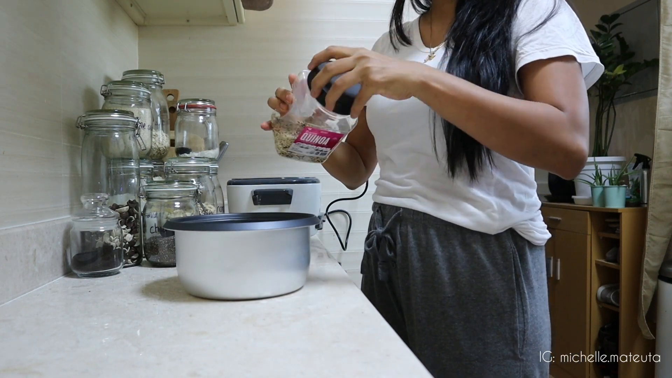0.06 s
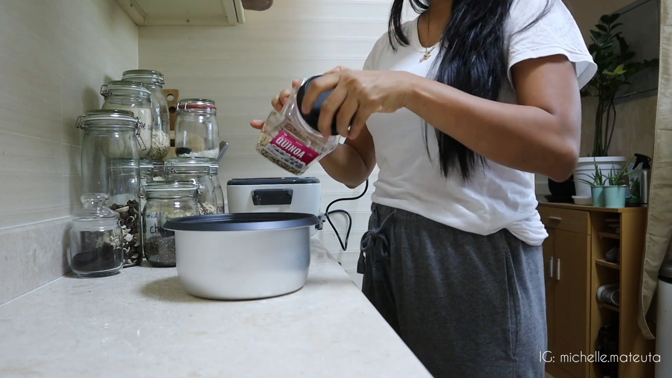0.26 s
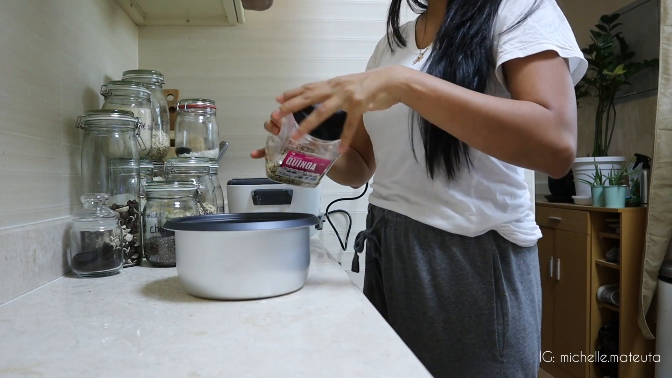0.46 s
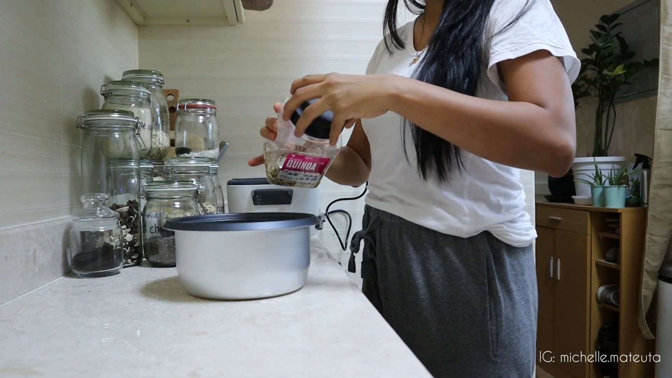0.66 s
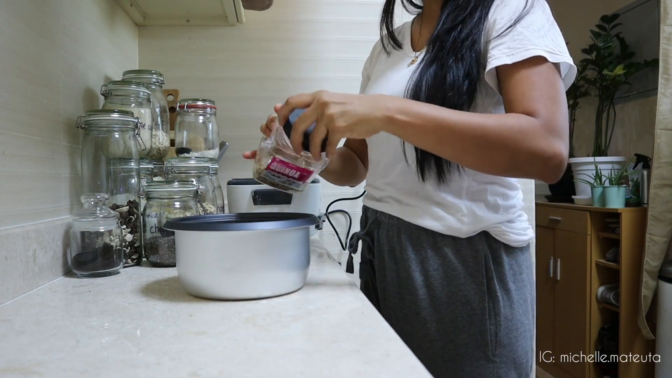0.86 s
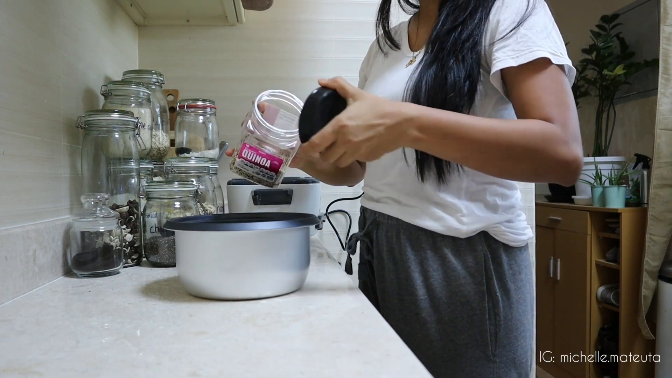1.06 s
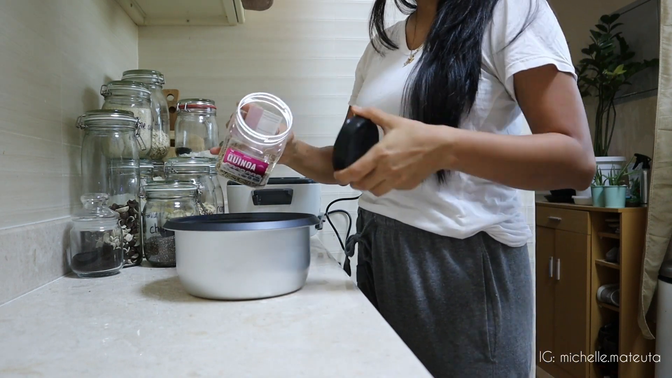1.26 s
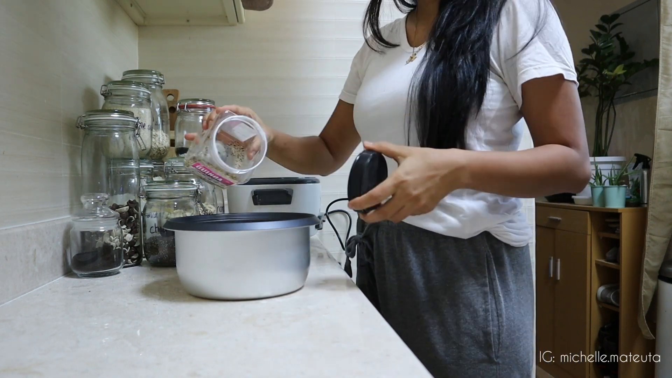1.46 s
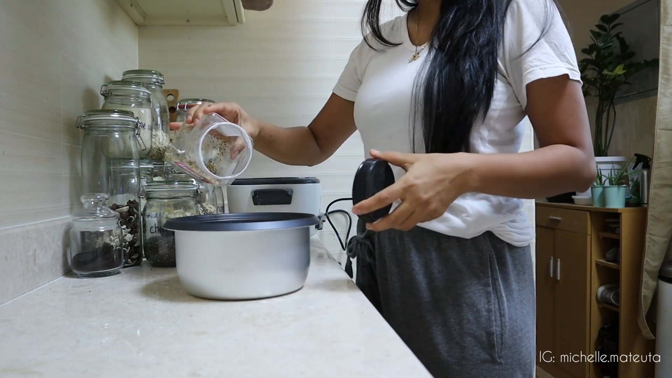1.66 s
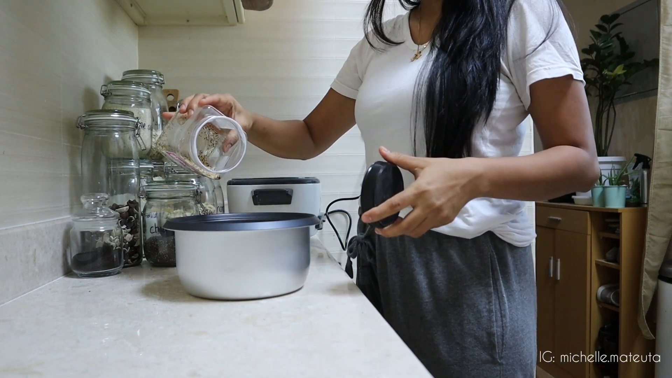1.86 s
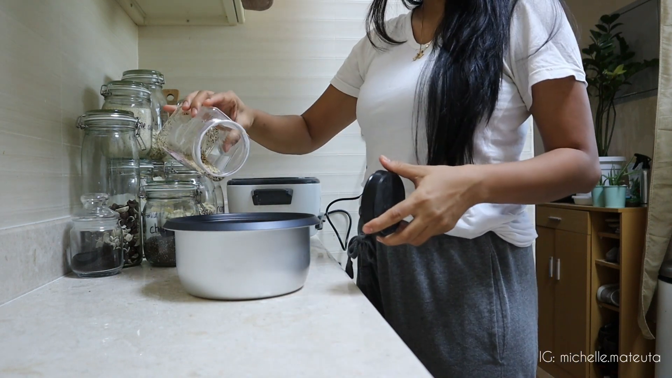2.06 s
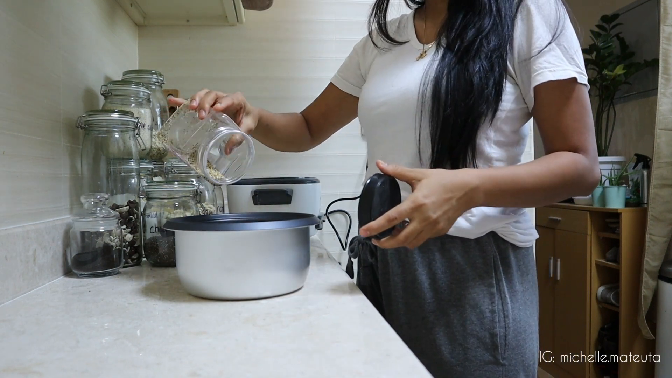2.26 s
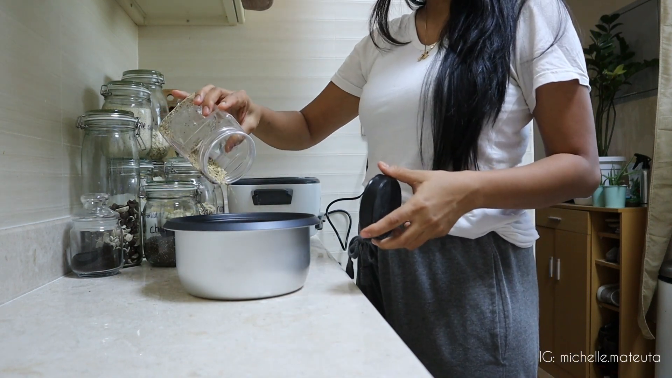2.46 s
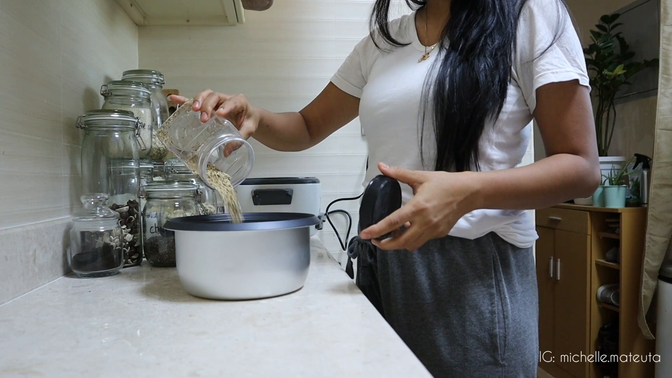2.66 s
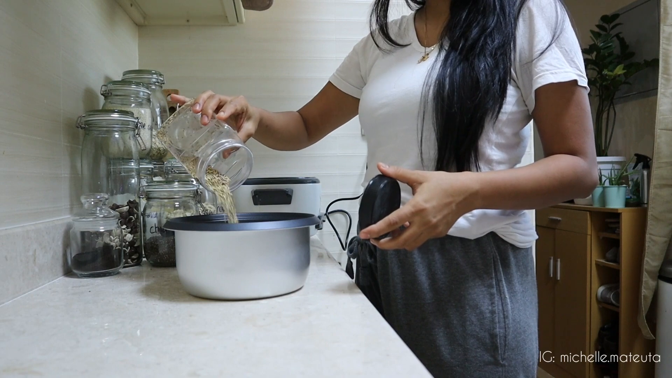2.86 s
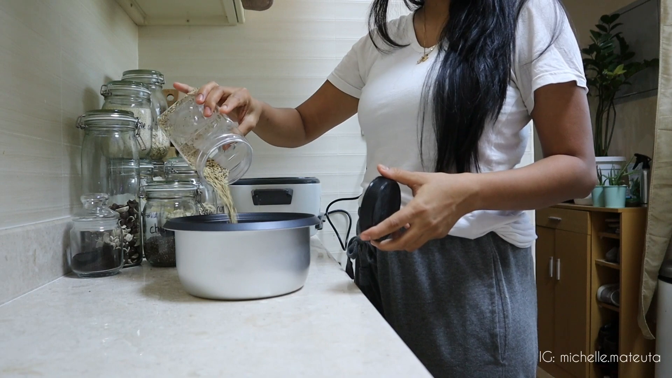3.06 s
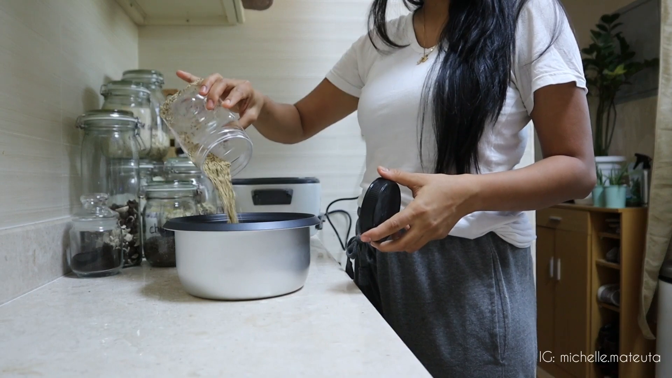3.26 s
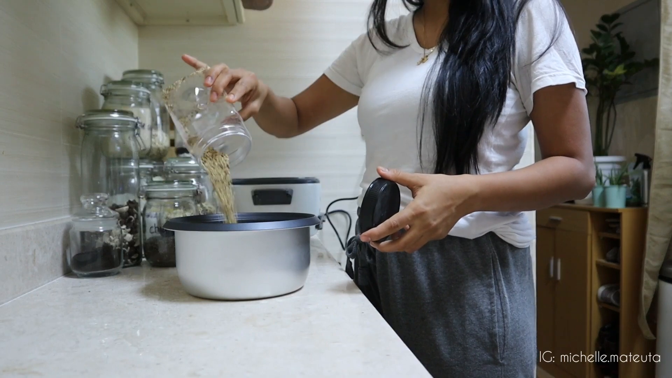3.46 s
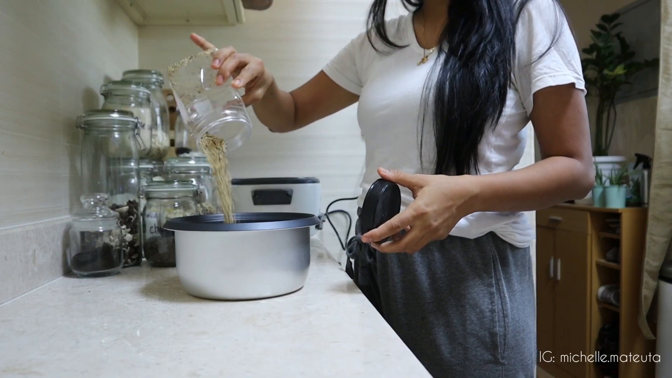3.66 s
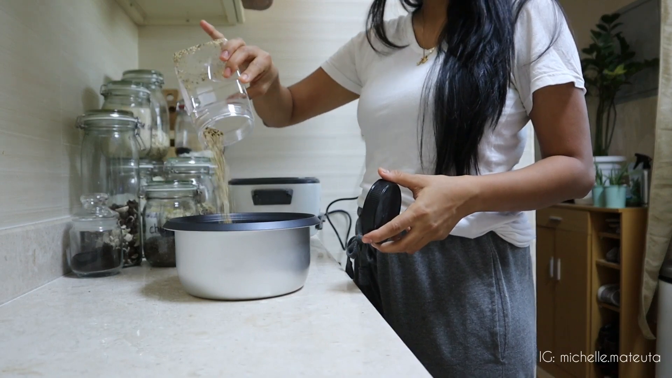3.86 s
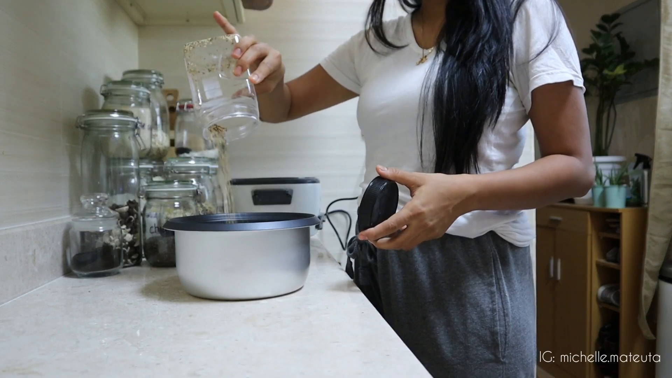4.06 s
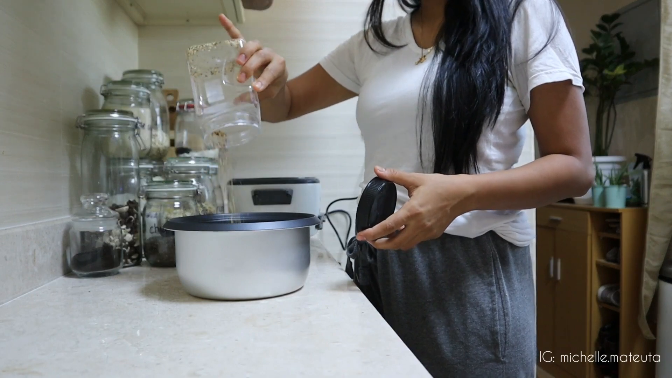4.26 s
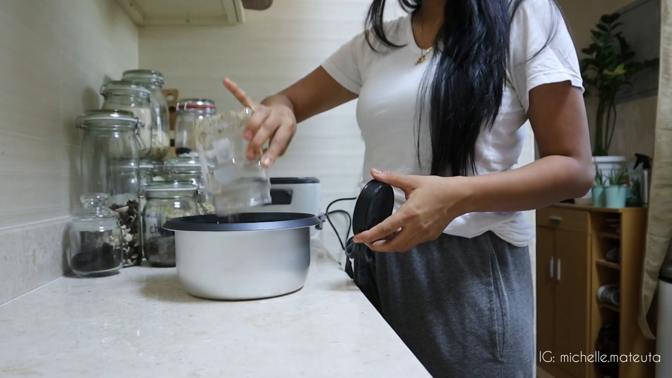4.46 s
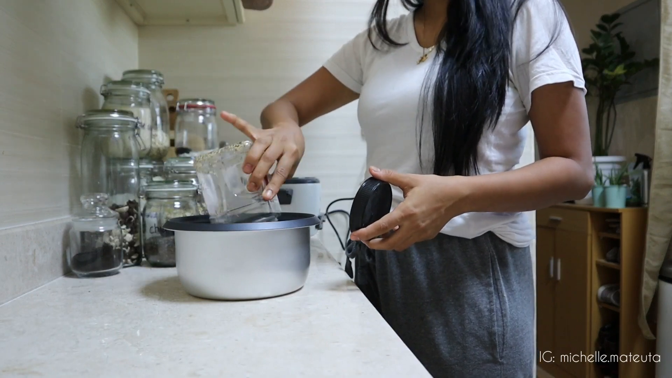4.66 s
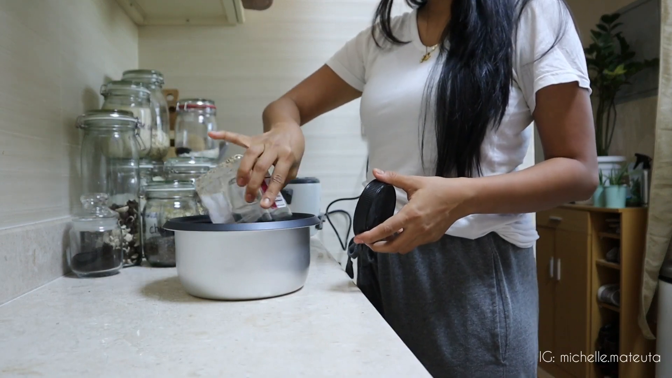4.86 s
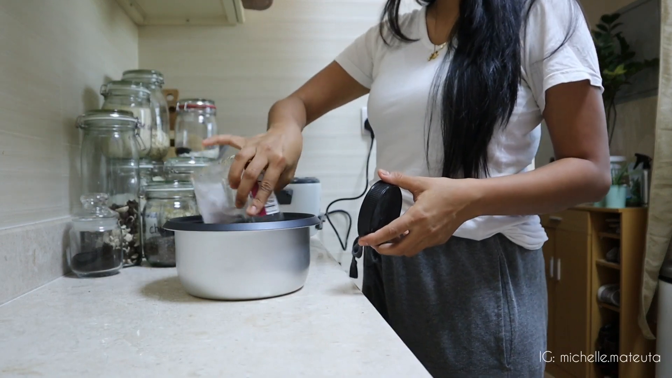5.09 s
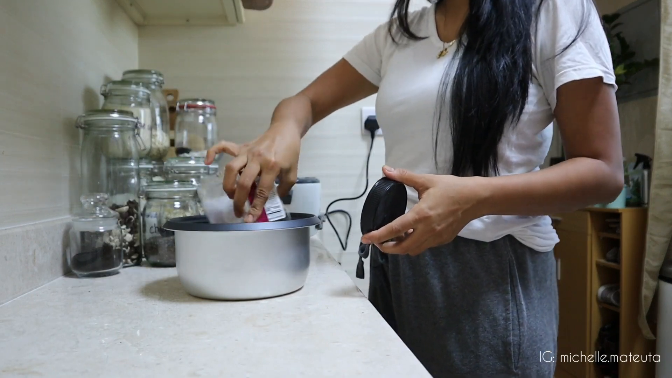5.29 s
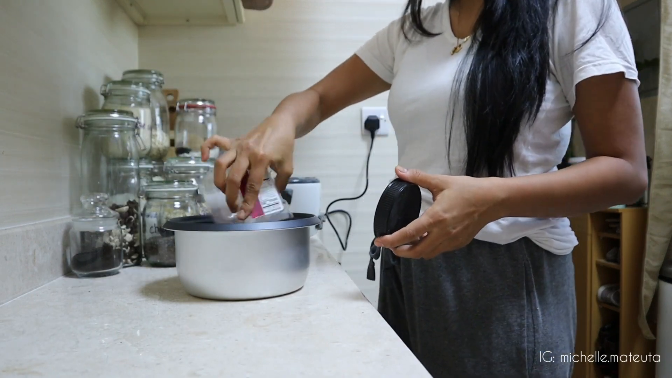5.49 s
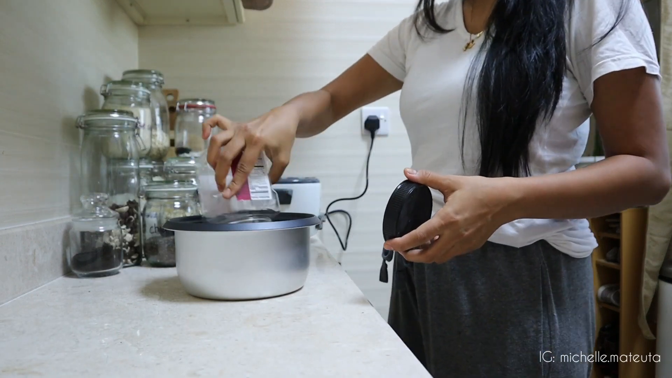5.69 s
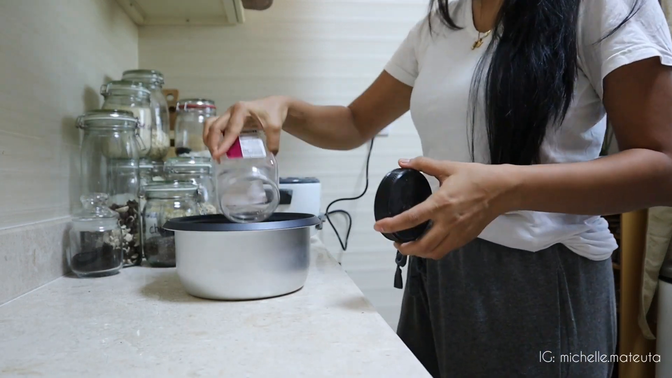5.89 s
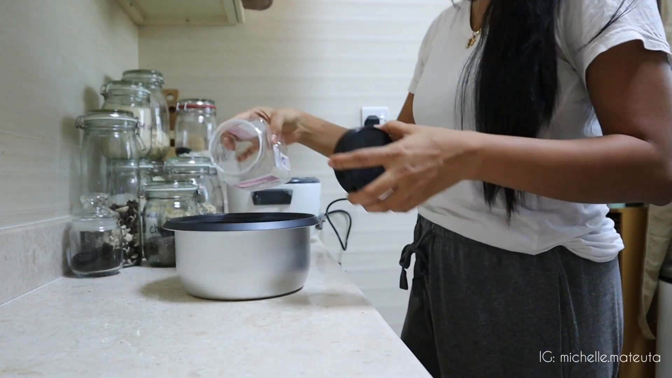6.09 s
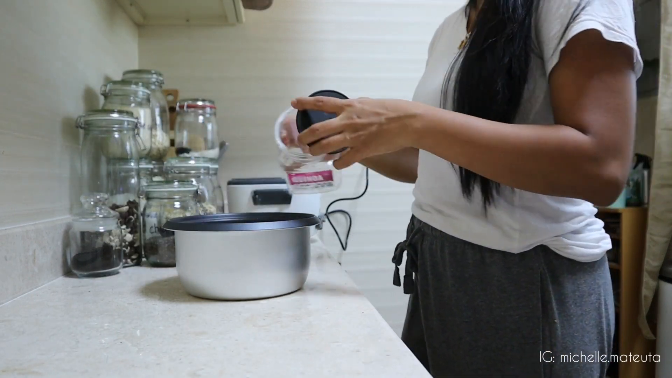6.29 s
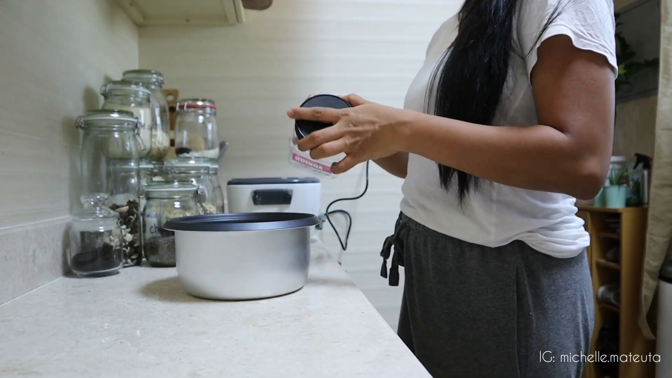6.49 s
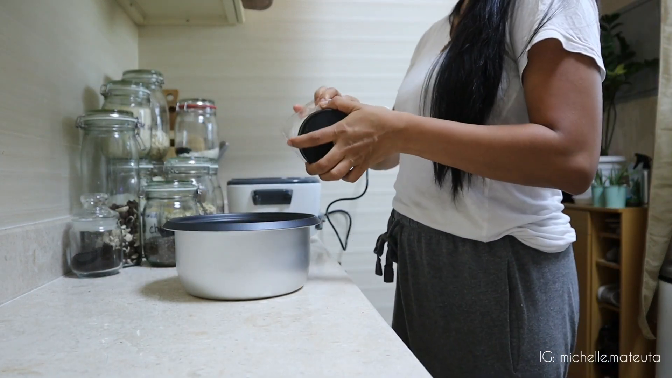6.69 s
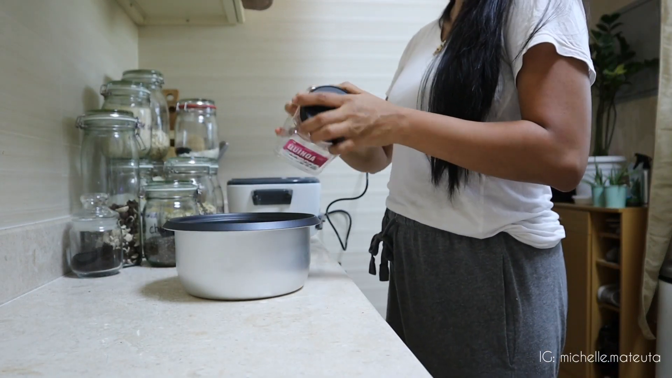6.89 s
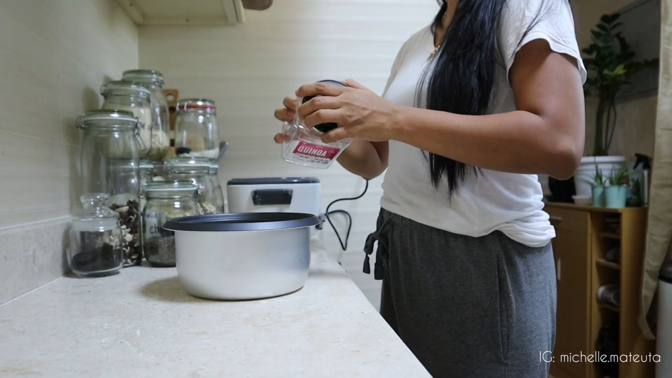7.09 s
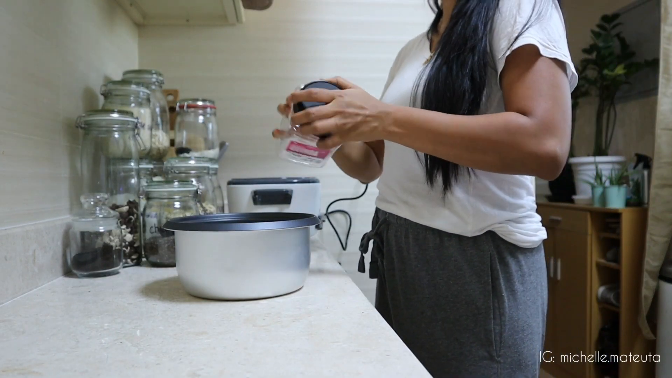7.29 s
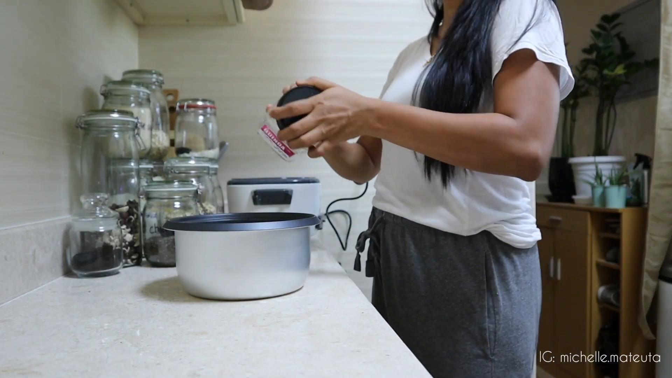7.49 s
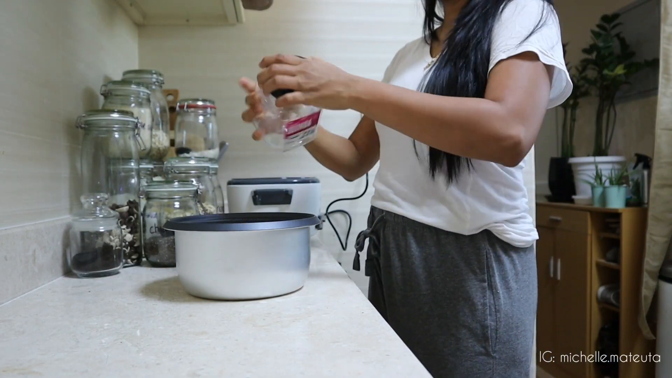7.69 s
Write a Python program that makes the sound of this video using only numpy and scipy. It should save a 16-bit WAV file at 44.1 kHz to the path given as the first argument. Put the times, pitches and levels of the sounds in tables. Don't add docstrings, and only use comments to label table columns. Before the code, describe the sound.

A screw lid rubs and snaps off a jar, dry grains rush hissing into a ringing metal pot, then the lid knocks and snaps back on.

```python
import sys
import numpy as np
from scipy import signal
from scipy.fft import rfft, irfft
from scipy.io import wavfile
from scipy.ndimage import uniform_filter1d

SR = 44100
rng = np.random.default_rng(int(sys.argv[2]) if len(sys.argv) > 2 else 0)


def wav_out(sig):
    wavfile.write(sys.argv[1], SR, np.round(np.clip(np.atleast_2d(sig).T, -1, 1) * 32767).astype(np.int16))


def decibels_to_gain(level_db):
    exponent = np.asarray(level_db, float) / 20
    return 10 ** exponent


N = 341334
CONTROL_STEP = 32


def rms_one(x):
    return x / np.sqrt(np.mean(x ** 2) + 1e-20)


def in_time(*tables):
    rows = []
    for table in tables:
        first, last = table[0], table[-1]
        rows += [(first[0] - .02, -120, *first[2:]), *table, (last[0] + .02, -120, *last[2:])]
    s, *columns = np.transpose(rows)
    return [np.interp(np.arange(N) / SR, s, column) for column in columns]


def at_hz(points, hz):
    table = np.array(points)
    return np.interp(np.log(hz + 1), np.log(table[:, 0]), table[:, 1])


def colour(x, spectrum):
    size = 4096
    cepstrum = irfft(np.log(decibels_to_gain(at_hz(spectrum, np.arange(size // 2 + 1) * SR / size))))
    cepstrum[1:size // 2] *= 2
    cepstrum[size // 2 + 1:] = 0
    pulse = irfft(np.exp(rfft(cepstrum)))
    return signal.oaconvolve(x, pulse / np.sqrt(np.sum(pulse ** 2)))[:N]


def resonate(x, hz, width):
    r, w = np.exp(-np.pi * width / SR), 2 * np.pi * hz / SR
    return signal.lfilter([0, np.sin(w)], [1, -2 * r * np.cos(w), r * r], x + 1e-18)


def body(x, peaks):
    out = 0
    for k, (hz, width, db) in enumerate(peaks):
        out = out + (-1) ** k * decibels_to_gain(db) * width / 50 * resonate(x, hz, width)
    return out


def cut(x, hz, kind):
    sos = signal.butter(2, hz, kind, fs=SR, output="sos")
    return signal.sosfilt(sos, x + np.resize([1e-18, 0], N))


def drift(rate):
    r = np.exp(-2 * np.pi * rate / SR)
    return rms_one(signal.lfilter([1], [1, -2 * r, r * r], rng.standard_normal(N + SR))[SR:])


def grains(per_s, spread_db, clump_db, clump_rate):
    sizes = decibels_to_gain(spread_db * np.minimum(rng.exponential(1, N), 4)) * rng.choice([-1, 1], N)
    landed = rng.random(N) < per_s / SR
    return rms_one(sizes * landed * decibels_to_gain(clump_db * drift(clump_rate)))


def bursts(times, gains, length):
    t = np.arange(12000) / SR
    out = np.zeros(N + len(t))
    for s, gain in zip(times, gains):
        out[round(s * SR):][:len(t)] += gain * rng.standard_normal(len(t)) * decibels_to_gain(-60 * t / length)
    return out[:N]


def tones(rows):
    t, out = np.arange(12000) / SR, np.zeros(N + 12000)
    for s, hz, width, db in rows:
        out[int(s * SR):][:len(t)] += decibels_to_gain(db) * np.sin(2 * np.pi * hz * t) * np.exp(-np.pi * width * t)
    return out[:N]


def stroke(s, db, hold, rise, fall):
    t = np.arange(0, N, CONTROL_STEP) / SR
    return decibels_to_gain(db - np.maximum(np.maximum(rise * (s - t), fall * (t - s - hold)), 0))


def smooth(control):
    return np.interp(np.arange(N), np.arange(0, N, CONTROL_STEP), control)


def near(hz, strongest_hz, db_per_octave):
    return decibels_to_gain(-db_per_octave * np.abs(np.log2(hz / strongest_hz)))


# f/Hz, width/Hz, level/dB
JAR_AIR = [(180, 35, -3), (250, 70, -1), (291, 25, -4), (345, 22, -3), (425, 24, 0), (525, 22, 0),
           (585, 25, -8)]
# f/Hz, width/Hz, level/dB
JAR_WALL = [(666, 166, 1.5), (838, 160, 4), (925, 186, 1.5), (1138, 106, -2.5), (1374, 146, -1),
            (1650, 230, -3.5), (1804, 146, -2.5), (1958, 115, -3), (2340, 320, -5), (2816, 78, -3.5),
            (3210, 120, -8.5)]
# f/Hz, width/Hz, level/dB
THREAD_TONES = [(650, 71, -18), (903, 60, 4), (1335, 120, 0.5), (1900, 140, 2.5)]
# t/s, boom level/dB, hold/s, wall level above boom/dB, favoured air f/Hz
UNSCREW = [
    (0.0, -40.5, 0.072, 1.5, 410),
    (.2, -45, 0.2, 9, 432),
    (.345, -42.5, 0.037, 1, 424),
    (.488, -43.5, 0.009, 4, 427),
    (.668, -51.5, 0.014, 3, 332),
    (.775, -46, 0.075, 5, 480),
    (.87, -54.5, 0.12, 8, 307),
    (.93, -44, 0.03, 2, 420),
]
STIR = [
    (4.912, -45.5, 0.0026, 17.5, 438),
    (5.07, -33, 0, 8.5, 436),
    (5.2, -38.5, 0.00096, 12.5, 437),
    (5.31, -47, 0.076, 11.5, 430),
    (5.48, -42, 0, 8, 430),
    (5.618, -48.5, 0.029, 9, 420),
    (5.786, -49.5, .0, 7, 424),
    (5.86, -62, 0.056, -5, 440),
]
SCREW_ON = [
    (6.53, -27, 0.025, 6, 467),
    (6.588, -27, 0.026, 0, 424),
    (6.955, -34.5, 0.057, 5.5, 407),
    (7.135, -31, 0.023, -14, 423),
    (7.612, -35.5, .0, 5.5, 390),
    (7.66, -37.5, 0.04, -2, 390),
    (7.74, -25, .0, 6, 408),
]
SEAT = [
    (6.468, -11.5, 0.016, -11, 525),
    (6.66, -36.5, 0.14, 6, 256),
    (6.815, -23, 0.0046, -2, 400),
    (7.09, -27, 0.04, -9, 392),
    (7.41, -22.5, 0.092, 8, 393),
]


def rubbing():
    gains, shares, walls = [], [], []
    tones_hz = np.array(JAR_AIR)[:, 0]
    # table, rise and fall (dB/s), selectivity (dB per octave)
    gestures = ((UNSCREW, 160.0, 200.0, 21), (STIR, 200.0, 130.0, 60),
                (SCREW_ON, 350.0, 380.0, 34), (SEAT, 6000.0, 260.0, 34))
    for rows, rise, fall, spread in gestures:
        for s, db, hold, wall_db, air_hz in rows:
            share = near(tones_hz, air_hz, spread)
            gains.append(stroke(s, db, hold, rise, fall))
            shares.append(share / np.linalg.norm(share))
            walls.append(decibels_to_gain(wall_db))
    air, shell = np.transpose(shares) @ gains, np.array(walls) @ gains
    slips = cut(grains(900, spread_db=0.0, clump_db=1.0, clump_rate=48), 145, "high")
    boom = 0
    for gain, mode in zip(air, JAR_AIR):
        hz, width, _ = mode
        boom = boom + smooth(gain) * rms_one(body(body(slips, [mode]), [(hz, 3 * width, 0)]))
    empty_wall = rms_one(cut(body(slips, JAR_WALL), 650, "high"))
    full_wall = rms_one(body(slips, THREAD_TONES))
    wall = np.where(np.arange(N) < 1.1 * SR, full_wall, empty_wall)
    return decibels_to_gain(-5.5) * boom + decibels_to_gain(-11.5) * smooth(shell) * wall


# f/Hz, level/dB per Hz
RUSTLE = [(300, -40), (425, -3), (762, -7), (885, -1.5), (994, -8), (2100, -6.5), (2900, 0), (6000, -4.5),
          (12100, -10.5), (16000, -14)]
# t/s, level/dB, brightness/dB
TURN = [
    (0.0, -45.5, 7),
    (.37, -43.5, 5),
    (.422, -48, 2),
    (.496, -42, 8),
    (.7, -54.5, 5.5),
    (.74, -72, -4),
    (.81, -50.5, -4),
    (.918, -51, 4),
    (.96, -47, 7),
]
# t/s, level/dB, brightness/dB
TIP = [
    (1.2, -56, 8),
    (1.4, -56, 4),
    (1.6, -60.5, -12),
    (1.67, -49.5, 5),
    (1.788, -38.5, 5),
    (1.956, -37, 9),
    (2.224, -43.5, -2),
    (2.43, -44, 4.5),
    (2.66, -39.5, 5),
]
# t/s, level/dB, hold/s, brightness/dB
BRUSHES = [(6.327, -55, 0.14, 7), (6.467, -31, 0, -7), (6.566, -30, 0.0075, -17), (6.662, -27, .0, -1),
           (6.713, -43.5, 0.054, 0), (6.812, -40, .0, -4), (6.921, -43, 0.12, 0), (7.054, -53, 0.023, -8),
           (7.557, -40, 0.0029, -12), (7.636, -40, 0.11, -4), (7.74, -32, 0.024, -15)]


def sliding():
    rustle_db, treble_db = in_time(TURN, TIP)
    gains = np.array([stroke(s, db, hold, rise=1900.0, fall=290.0) for s, db, hold, bright_db in BRUSHES])
    bright_db = np.array(BRUSHES)[:, -1]
    soft = decibels_to_gain(rustle_db) + smooth(gains.sum(axis=0))
    sharp = decibels_to_gain(rustle_db + treble_db) + smooth(decibels_to_gain(bright_db) @ gains)
    rustle = colour(grains(9000, spread_db=2.5, clump_db=-1.44, clump_rate=15), RUSTLE)
    low = rms_one(cut(rustle, 7000, "low"))
    high = rms_one(cut(np.roll(rustle, 4001), 7000, "high"))
    return soft * low + decibels_to_gain(-7.5) * sharp * high


# f/Hz, level/dB per Hz
ROOM_TONE = [(20, -21), (100, -13.5), (220, -15), (300, -13), (660, -15.5), (950, -16), (1200, -21.5),
             (2200, -21.5), (6000, -28.5), (16000, -30.5)]
# f/Hz, width/Hz, level/dB
HUM = [(99.3, 7, -19.5), (152.8, 4, -16), (165.4, 2.9, -16), (209.3, 8.1, -20.5)]
# t/s, level/dB, deepest part level/dB
MOVING = [(0, -58, 11), (.4, -60, -3), (.62, -50.5, 4), (.9, -47, -6), (1.1, -59, -2), (2.6, -61, 0),
          (2.75, -82, 8), (5.0, -73, 4), (5.8, -63, -4), (6.45, -63, -7), (6.6, -37, -35), (6.9, -57, -22),
          (7.74, -74, -3)]


def background():
    rumble_db, deep_db = in_time(MOVING)
    air = colour(rng.standard_normal(N), ROOM_TONE)
    hum = rms_one(body(rng.standard_normal(N), HUM))
    air_db = -51.5 + 0.16 * (rumble_db + 54.5)
    low = cut(cut(rng.standard_normal(N), 95, "low"), 105, "low")
    upper = rms_one(cut(cut(cut(low, 69, "high"), 67, "high"), 63, "high"))
    deepest = rms_one(cut(cut(low, 40, "low"), 21, "high"))
    rumble = upper + decibels_to_gain(deep_db - 4.0) * deepest
    mains = decibels_to_gain(-58 + drift(3.3)) * np.sin(2 * np.pi * 97 * np.arange(N) / SR)
    return decibels_to_gain(air_db) * (air + decibels_to_gain(-5) * hum) + mains + decibels_to_gain(rumble_db) * rumble


# t/s, f/Hz, width/Hz, level/dB
AFTER_RING = [(.977, 430, 19, -16), (.972, 3160, 90, -17), (.972, 5800, 100, -10), (.985, 5650, 10, -38),
              (6.812, 1170, 50, -23), (.335, 430, 10, -43), (0.4, 430, 8, -43), (7.402, 305, 40, -11),
              (6.468, 2800, 66, -25), (.972, 350, 23, -18), (.978, 1370, 12, -20), (.978, 1390, 10, -32),
              (.98, 1590, 14, -29), (.978, 224, 7.6, -32), (6.444, 535, 16, -15), (6.466, 522, 10, -11),
              (6.47, 585, 14, -18), (6.813, 427, 9, -24), (.98, 495, 6, -34), (.98, 345, 5, -31),
              (6.49, 1420, 20, -24), (6.452, 1240, 40, -25), (7.405, 3800, 40, -17),
              (6.468, 1140, 30, -14.5), (6.472, 1500, 30, -16), (6.52, 1150, 12, -23),
              (6.535, 1390, 20, -20), (6.445, 830, 17, -23), (6.445, 2100, 36, -26), (6.47, 340, 7, -20),
              (7.404, 347, 3.5, -21.5), (7.404, 310, 7.7, -26), (7.41, 1403, 24, -25),
              (7.445, 1365, 6, -27), (7.408, 800, 16, -23), (7.406, 2100, 40, -15)]


def after_ring():
    return cut(cut(tones(AFTER_RING), 130, "high"), 110, "high")


# f/Hz, level/dB per Hz
CRACK = [(500, -54), (1000, -9), (1500, -6.5), (2400, -9), (3200, -1), (4500, -6), (5700, -0.5),
         (8000, -10), (11000, -9), (16000, -17)]
# t/s, boom level/dB, favoured air f/Hz, wall level/dB, crack level/dB
ON_SIDE = [
    (0.772, -41, 424, -43, -48),
    (.805, -40, 300, -35, -48),
    (0.821, -32, 200, -36, -51),
    (6.585, -11.5, 424, -19.5, -42),
    (6.721, -27, 300, -21, -33),
    (6.8121, -22.5, 450, -18.5, -36),
    (7.093, -27, 400, -31.5, -44),
    (7.121, -32, 420, -28, -43),
    (7.137, -28, 261, -26, -50),
    (7.152, -39, 420, -31, -50),
]
ON_SHOULDER = [
    (0.9717, -10.5, 258, -43, -3.5),
    (.977, -19, 430, -10.5, -18.5),
    (6.4681, -24, 530, -7, -26),
    (6.478, -22, 193, -16, -43),
    (6.657, -13.5, 201, -14, -19.5),
    (6.662, -23, 430, -30, -29),
    (7.4023, -6, 260, -6.5, -0.5),
    (7.409, -14.5, 415, -13, -7),
    (7.717, -36, 403, -33, -32),
]
ON_RIM = [(.973, -40, 430, -13.5, -37), (6.515, -23, 480, -38, -37), (7.404, -40, 340, -16, -28),
          (0.966, -28, 418, -29, -34), (6.4439, -24, 530, -12.5, -29), (6.447, -12, 180, -40, -45),
          (6.4695, -14, 179, -42, -45), (6.541, -12, 197, -18, -35), (6.566, -41, 420, -23, -29),
          (6.578, -15, 182, -16.5, -28), (6.66, -40, 420, -24, -24), (7.123, -15.5, 290, -30.5, -56),
          (7.132, -26.5, 192, -47, -55)]


def lid():
    parts = (ON_SIDE, 880), (ON_SHOULDER, 1360), (ON_RIM, 1900)
    knocks = sorted((*row, hz) for rows, hz in parts for row in rows)
    s, boom_db, air_hz, wall_db, crack_db, wall_hz = np.transpose(knocks)
    snap = bursts(s, decibels_to_gain(crack_db + 1.5), 0.016)
    buzz = bursts(s, decibels_to_gain(crack_db - 24.0), 0.52)
    out = colour(snap + buzz, CRACK)
    modes = JAR_AIR + JAR_WALL
    luck = rng.normal(0, 1, (len(s), len(modes)))
    for k, (hz, width, db) in enumerate(modes):
        if k < len(JAR_AIR):
            strength = decibels_to_gain(boom_db) * near(hz, air_hz, 22.0)
        else:
            strength = decibels_to_gain(wall_db) * near(hz, wall_hz, 14.3)
        clicks = np.zeros(N)
        clicks[(s * SR).astype(int)] = strength * decibels_to_gain(db + 0.1 * luck[:, k]) * (-1) ** k
        out += resonate(clicks, hz, 0.74 * width)
    return cut(out, 120, "high")


# f/Hz, level/dB per Hz
FALL = [(250, -44.5), (420, -24), (800, -17), (1250, -8.5), (1900, -15.5), (2400, -7), (3800, -4),
        (4600, -8.5), (5600, -1), (6800, -9.5), (8000, -4), (9000, -4.5), (12000, -3.5), (16000, -6)]
# t/s, peak level/dB, level around 3.4 kHz relative to peak/dB
TICKS = [(2.338, -32.5, -2), (2.4246, -20.5, -2.5), (2.5506, -26.5, -19), (2.611, -14, -5),
         (2.6634, -15, -7), (2.683, -6.5, -19), (5.0168, -22, -15), (5.3022, -9, -23), (5.6399, -20, -13),
         (5.7507, -27, -13), (5.9098, -24, -7), (6.1288, -34, -1), (6.3812, -42, -8), (6.4152, -38, -8),
         (5.4406, -13, -19), (5.502, -15.5, -25), (5.553, -12.5, -31), (5.6197, -34, -19),
         (5.6722, -15.5, -11), (5.985, -29, -15), (5.694, -24, 2), (5.7645, -21, -18), (5.789, -17.5, -15),
         (5.842, -25.5, 0), (5.9004, -34, -10), (5.924, -24, -7), (5.982, -28, -22), (6.0155, -26.5, -1),
         (5.9135, -27, -15), (5.92, -26, -15), (5.931, -34, -15), (6.171, -36, -20), (6.0633, -23, -16),
         (6.1503, -22, -11), (6.259, -23, -21), (7.3194, -35, -4), (7.6333, -27, 3), (6.177, -28, -22),
         (6.271, -31, -2), (6.3602, -33, -10), (7.073, -27, 2), (7.113, -40, -18), (7.233, -42.5, 6),
         (7.598, -31, 5.5)]
# t/s, f/Hz, width/Hz, level/dB
PINGS = [(5.62, 3730, 25, -30), (5.766, 5500, 40, -22), (5.79, 5640, 40, -22), (5.79, 2780, 4, -31),
         (5.79, 2410, 12, -39), (5.79, 2130, 12, -37), (5.81, 2880, 8, -36), (5.844, 2850, 14, -39),
         (5.95, 5900, 40, -32), (6.175, 5400, 50, -26), (6.176, 2410, 8, -42), (6.365, 3060, 25, -44),
         (2.611, 2280, 16, -39), (7.598, 5400, 60, -33)]


def lone_grains():
    s, peak_db, low_db = np.transpose(TICKS)
    spatter = bursts(s, decibels_to_gain(peak_db - 6.5), 0.045) + bursts(s, decibels_to_gain(peak_db - 3.0), 0.003)
    out = colour(cut(spatter, 7200, "high"), FALL)
    out += cut(cut(bursts(s, decibels_to_gain(peak_db + low_db + 3.5), 0.033), 3700, "low"), 3050, "high")
    return out + decibels_to_gain(-5) * tones(PINGS)


# t/s, level/dB, hold/s
SHAKES = [(2.62, -31, .0), (4.84, -33, 0.009), (5.02, -22, 0.019), (5.163, -26, 0.041), (5.256, -28.5, 0),
          (5.311, -26, 0.0036), (5.348, -32, 0.05), (5.45, -30.5, 0.017), (5.505, -42, .0),
          (5.577, -33, 0.028), (5.62, -42, 0.017), (5.76, -38.5, 0.035), (5.857, -43, 0.014),
          (5.908, -46, 0), (6.016, -49, .0), (6.152, -52, .0), (6.262, -53, 0.016)]
# t/s, level/dB
POUR = [
    (2.65, -51),
    (2.69, -20.5),
    (2.76, -11.5),
    (2.87, -14.5),
    (3.12, -16),
    (3.53, -14),
    (4.55, -18.5),
    (4.76, -22),
    (4.85, -21.5),
    (4.93, -22.5),
]
# t/s, level/dB
DREGS = [
    (5.01, -22),
    (5.24, -26.5),
    (5.5, -32),
    (5.74, -37.5),
    (5.9, -41.5),
    (6.24, -55),
    (6.4, -57.5),
]


def stream():
    t = np.arange(N) / SR
    flow_db, = in_time(POUR + DREGS)
    thrown = smooth(sum(stroke(s, db, hold, rise=915, fall=290) for s, db, hold in SHAKES))
    bare = np.exp(-np.maximum(t - 2.89, 0) / 0.95)
    loaded = .5 + .5 * np.tanh((t - 3.81) / 0.42)
    thin_db = 0.23 * np.clip(-12.0 - flow_db, 0, 40)
    heavy = np.hypot(decibels_to_gain(flow_db + thin_db), decibels_to_gain(3.5) * thrown)
    rain = grains(14000, spread_db=3.0, clump_db=0.8, clump_rate=30)
    fall = colour(rain, FALL)
    bright = rms_one(cut(fall, 6500, "high"))
    dull = rms_one(cut(np.roll(fall, 4001), 6500, "low"))
    strikes = rain * decibels_to_gain(0.56 * drift(6.0))
    main, ring = pot_ring(strikes, bare, loaded)
    jar_damps_db = -8 * np.clip((t - 4.58) / 0.028, 0, 1)
    ring_db = -9 + 6 * bare + jar_damps_db
    clicks = np.hypot(decibels_to_gain(flow_db), thrown) * bright
    struck = heavy * (decibels_to_gain(-9.5 - 6.5 * bare) * dull + decibels_to_gain(ring_db) * ring)
    return main + bare_drum(rain) + jar_ring(strikes, heavy, thrown) + clicks + struck


# f/Hz, width/Hz, level/dB
POT = [(1180, 37, -13), (1286, 39, -10), (1386, 26, -7), (1573, 13, -8.5), (1778, 8.5, -8), (2130, 34, -15),
       (2246, 9, 3.5), (2514, 19, -3), (2704, 90, -10), (3093, 27, -3.5), (3330, 63, -7.5), (3630, 46, -5),
       (4085, 52, -4), (4280, 30, -3.5), (4845, 41, -1.5), (5580, 77, -2.5), (5760, 30, 2.5),
       (6380, 58, -5), (7010, 94, -8), (7400, 30, -6.5), (7850, 30, -4.5), (8110, 250, -9),
       (9500, 93, -7.5)]
POT_COVERED_DB = [1.5, -1, -1.5, 0, 4.5, 0.1, -3, -10.5, -8.3, -1.5, -1.5, -1.5, -3.5, 7, -3, 0.5, -5.5,
                  -1.7, -3.5, 0, 2, 2.3, -1.5]
# f/Hz, width/Hz, level/dB
LOADED_FLOOR = [(1880, 19, -6), (2214, 63, -4.5), (2405, 26, -11), (2960, 51, -16), (5600, 50, -10)]
# t/s, level/dB
MAIN_SINGS = [
    (2.69, -38),
    (2.75, -28),
    (2.95, -31),
    (3.09, -39),
    (3.17, -30),
    (3.4, -32),
    (3.6, -35),
    (3.74, -31),
    (3.79, -50),
]
FLOOR_TONES = 4, 6, 9, 10, 11, 12, 13


def pot_ring(strikes, bare, loaded):
    ring = 0
    wavering = strikes * decibels_to_gain(1.2 * drift(3.6))
    for k, (hz, width, db) in enumerate(POT + LOADED_FLOOR):
        mine = np.roll(wavering, (k + 1) * 15013)
        if k < len(POT):
            mine = mine * decibels_to_gain(POT_COVERED_DB[k] * (1 - bare))
        if k in (3, 7, 14, 16):
            mine = mine * (0.65 + 0.35 * bare) * (1 - 0.36 * loaded)
        if k == 6:
            tone = rms_one(resonate(mine, 2264, 11))
            steady = tone / np.sqrt(uniform_filter1d(tone ** 2, size=2500) + .1)
            main = decibels_to_gain(in_time(MAIN_SINGS)[0]) * steady
            continue
        if k in FLOOR_TONES:
            mine = mine * (1 - 0.89 * loaded)
        elif k >= len(POT):
            mine = mine * loaded
        ring = ring + body(mine, [(hz, width, db)])
    return main, rms_one(cut(cut(ring, 1000, "high"), 900, "high"))


# t/s, level/dB
BARE_FLOOR = [
    (2.69, -46),
    (2.75, -48),
    (3.05, -47),
    (3.25, -68),
]


def bare_drum(rain):
    return decibels_to_gain(in_time(BARE_FLOOR)[0]) * rms_one(body(rain, [(675, 63, -9.5), (705, 63, -5.0)]))


# f/Hz, width/Hz, level/dB
JAR_TONES = [(447, 18, 1.5), (734, 32, -0.5), (1120, 45, -3.5), (2480, 18, -3), (2790, 64, -2.5),
             (3665, 53, 1.5)]


def jar_ring(strikes, heavy, thrown):
    inside = np.clip((np.arange(N) / SR - 4.87) / 0.027, 0, 1)
    ring = cut(cut(body(np.roll(strikes, 7001), JAR_TONES), 400, "high"), 400, "high")
    return inside * np.hypot(0.69 * heavy, 2.6 * thrown) * decibels_to_gain(-20.5) * rms_one(ring)


# f/Hz, T60/s
KITCHEN_T60 = [(125, 0.061), (500, 0.37), (2000, 0.36), (8000, 0.069), (16000, 0.16)]
# f/Hz, level/dB
KNOCK_ROOM = [(150, 9), (350, -8), (430, -6.5), (560, -1), (1400, 1.5), (2800, -2.5), (6000, 1.5),
              (16000, 1)]


def kitchen(soft, hard):
    x = decibels_to_gain(-15) * soft + decibels_to_gain(-6.0) * colour(hard, KNOCK_ROOM)
    t, answer = np.arange(SR // 2) / SR, 0
    for hz in 90 * 2. ** np.arange(8):
        band = signal.butter(2, [hz, min(2 * hz, 20000)], "band", fs=SR, output="sos")
        decay = decibels_to_gain(-60 * t / at_hz(KITCHEN_T60, np.sqrt(2) * hz))
        answer = answer + signal.sosfilt(band, rng.standard_normal(len(t))) * decay
    answer = answer * np.clip(t / 0.0025, 0, 1)
    return signal.fftconvolve(x, answer / np.sqrt(np.sum(answer ** 2)))[:N]


def apart(x):
    hiss = cut(rng.standard_normal(N), 150, "high")
    hiss = hiss + 2 * cut(cut(rng.standard_normal(N), 900, "low"), 250, "high")
    out, frame = decibels_to_gain(-71) * rms_one(hiss), 2048
    for i in range(0, N - frame, frame // 2):
        chance, place, patch = rng.random(), rng.random(), rng.standard_normal(frame)
        if chance < .16:
            low = 4200 + 10000 * place ** .5
            band = signal.butter(4, [low, low + 1500], "band", fs=SR, output="sos")
            level = np.std(signal.sosfilt(band, x[i:i + frame]))
            out[i:i + frame] += decibels_to_gain(-2) * level * rms_one(signal.sosfilt(band, patch)) * np.hanning(frame)
    return out


def scene():
    soft = rubbing() + sliding() + stream()
    hard = lid() + lone_grains()
    mono = soft + hard + kitchen(soft, hard) + after_ring() + background()
    return np.array([mono, mono])


def low_pass(x):
    return signal.sosfilt(signal.butter(12, 16440, fs=SR, output="sos"), x)


def record(dry):
    wide = np.clip(dry, -1, 1) + apart(dry[0]) * [[1], [-1]]
    dull = signal.sosfilt(signal.ellip(10, .5, 40, 15760, fs=SR, output="sos"), wide)
    mix = np.clip(dull, -1, 1)
    return low_pass(mix)


dry = scene()
out = record(dry)
wav_out(out)
```